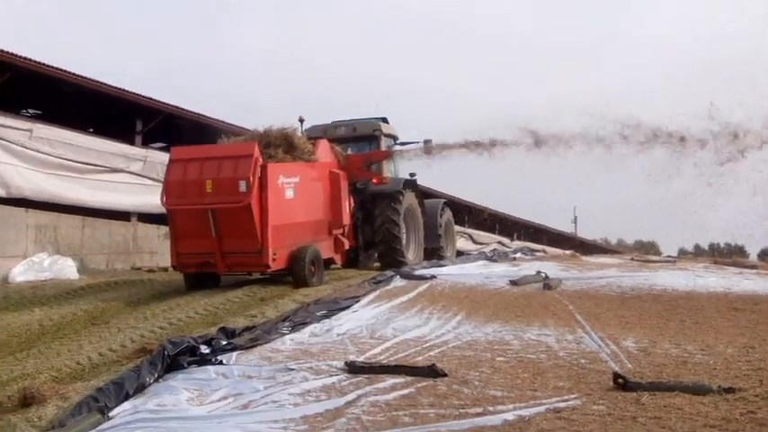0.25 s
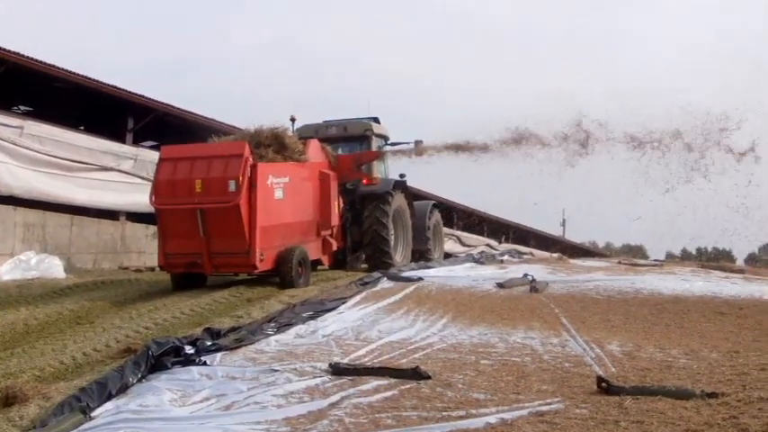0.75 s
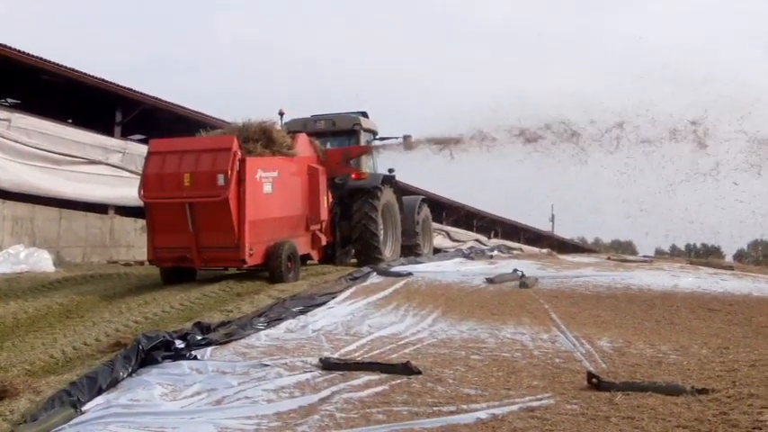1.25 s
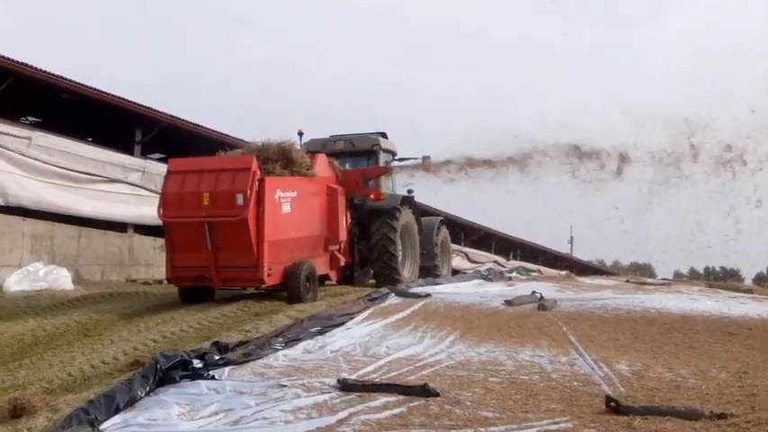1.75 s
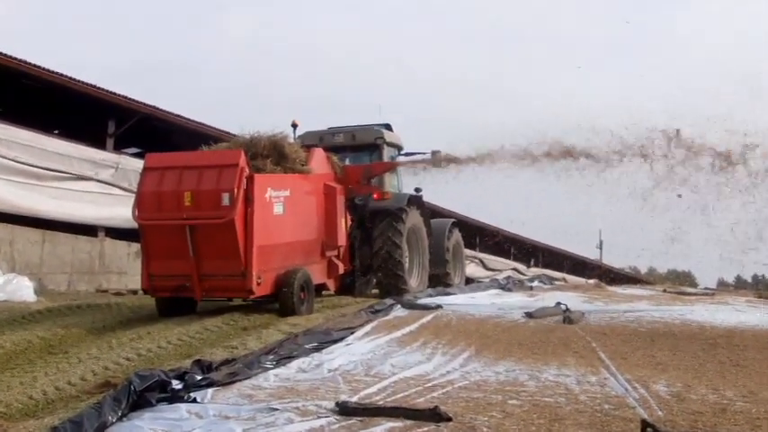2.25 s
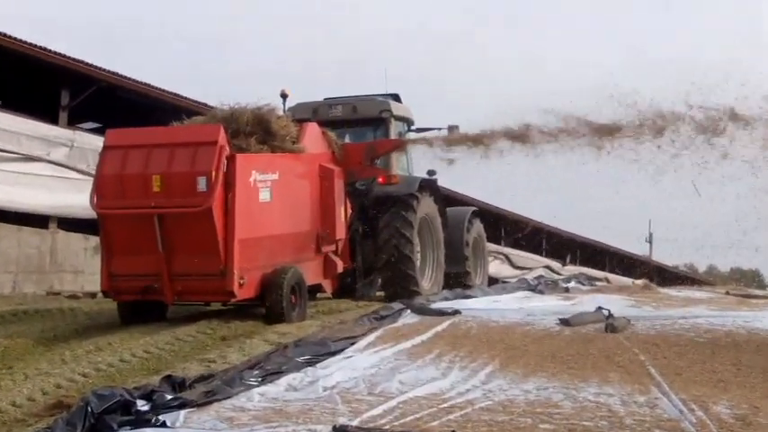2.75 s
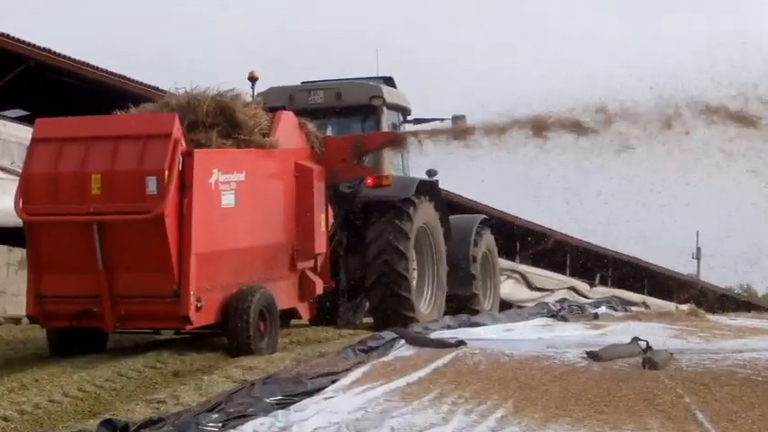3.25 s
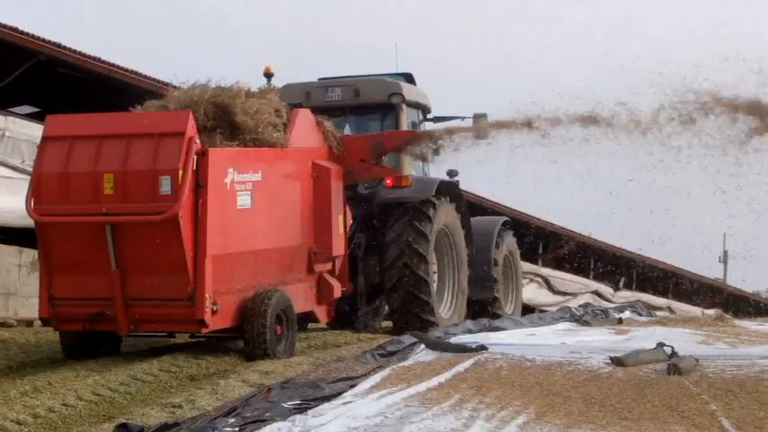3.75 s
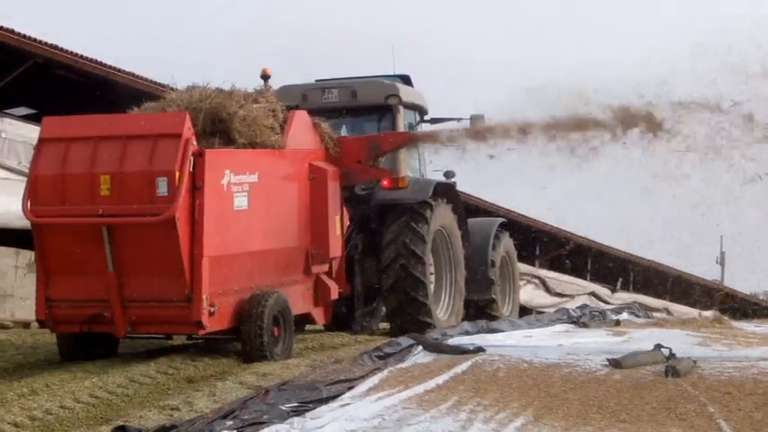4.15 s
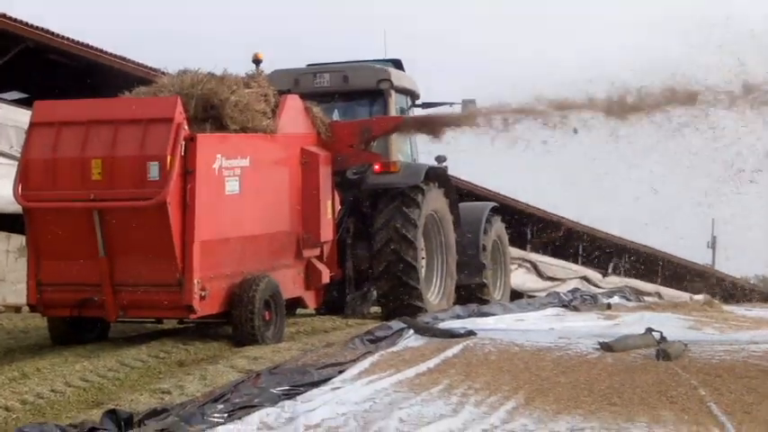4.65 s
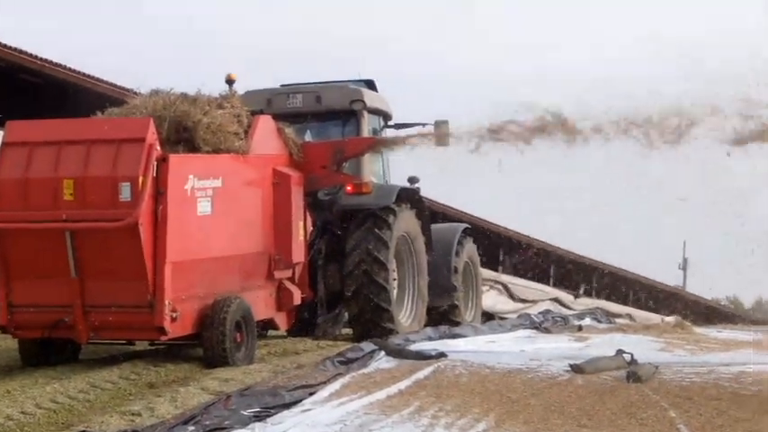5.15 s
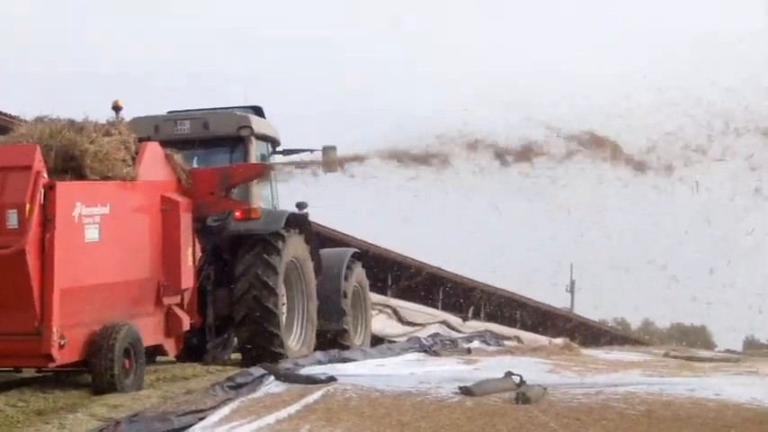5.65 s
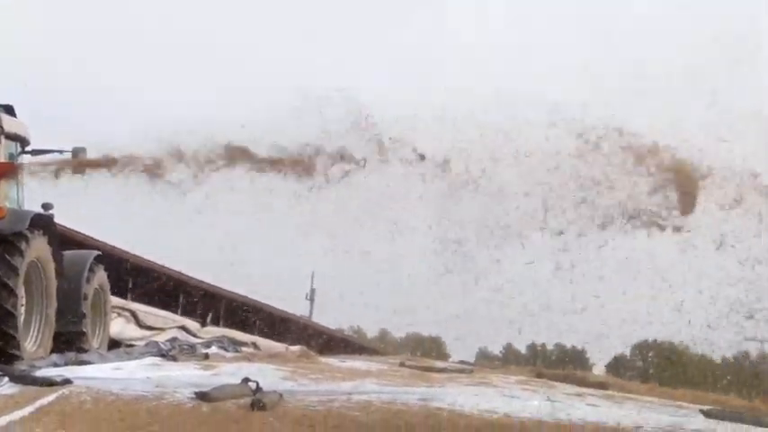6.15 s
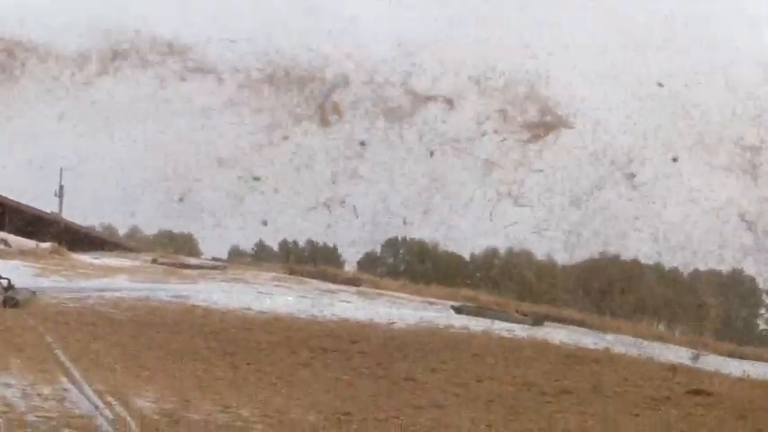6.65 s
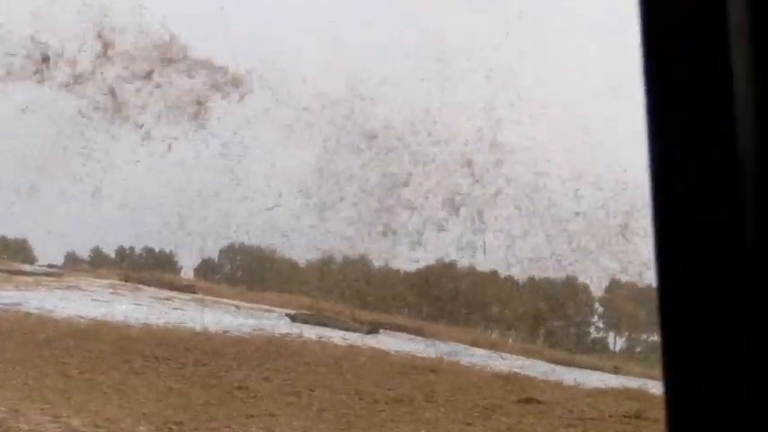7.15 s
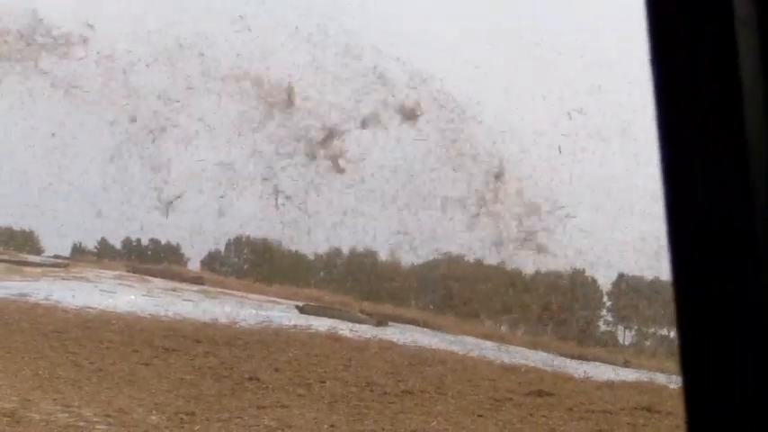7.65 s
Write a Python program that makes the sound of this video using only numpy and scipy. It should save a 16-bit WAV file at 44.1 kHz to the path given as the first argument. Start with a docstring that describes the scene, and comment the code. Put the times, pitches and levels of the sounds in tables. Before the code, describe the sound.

Heard from some way off on one microphone outdoors, a bale shredder runs without a break: tractor exhaust drone, pulsing blower paddles and a broad roar. Over it comes a constant hiss of stalks on steel, dotted with small pings and crunchy clumps. A farther engine rises in pitch twice underneath, and the sound softens a little toward the end.

```python
"""Bale shredder in an open yard

A six-cylinder diesel tractor turns a bale shredder, some way off from a camera's single microphone.
The exhaust drones, the blower's paddles throb against it and straw rattles through the steel chute
in clumps. A second engine farther away revs up twice. Near the end the microphone turns aside."""
import sys
import numpy as np
from scipy import signal
from scipy.fft import rfft, irfft, next_fast_len
from scipy.io import wavfile
from scipy.ndimage import uniform_filter1d, map_coordinates

SR = 44100
rng = np.random.default_rng(int(sys.argv[2]) if len(sys.argv) > 2 else 0)


def to_wav(s):
    """Save 16-bit WAV."""
    ch = np.atleast_2d(s).T  # columns
    pcm = np.round(np.clip(ch, -1, 1) * 32767)  # PCM
    wavfile.write(sys.argv[1], SR, pcm.astype(np.int16))


N = 348390

# Modes of the steel chute. Each row: frequency in Hz, seconds to die away by 60 dB, relative level in dB.
CHUTE_MODES = [(2120, 0.043, -4.5), (2487, 0.042, -1.5), (2872, 0.075, 0), (3610, 0.043, -9.5),
               (3800, 0.061, -0.5), (4150, 0.053, -1.5), (4650, 0.045, -1), (5040, 0.062, 2),
               (5180, 0.056, -2), (5440, .04, 0.5), (5730, 0.048, 0), (6180, 0.047, -1.5), (6790, .03, 0),
               (9370, 0.035, -12.5), (9800, .03, -20), (11600, .03, -14.5)]


def amp(db):
    """Gain of a level in dB."""
    return 10 ** (np.asarray(db) / 20)


def unit(x):
    """x at rms 1."""
    return x / np.sqrt(np.mean(x ** 2) + 1e-20)


def curve(points):
    """(seconds, value) points joined by straight lines, one value a sample."""
    seconds, values = np.transpose(points)
    return np.interp(np.arange(N) / SR, seconds, values)


def wobble(rate):
    """A smooth random curve, rate knots a second."""
    knots = rng.standard_normal(int(N * rate / SR) + 4)
    return map_coordinates(knots, [np.arange(N) * rate / SR])


def filtered(x, response):
    """x through a filter whose gain is response(Hz)."""
    size = next_fast_len(N + 8192)
    return irfft(rfft(x, size) * response(np.fft.rfftfreq(size, 1 / SR)), size)[..., :N]


def coloured(x, spectrum):
    """x shaped by (Hz, dB) points on a log frequency axis, at rms 1."""
    hz, db = np.transpose(spectrum)
    return unit(filtered(x, lambda f: amp(np.interp(np.log(f + 1), np.log(hz + 1), db))))


def phase_of(hz):
    """Angle in radians run through at a changing rate."""
    return 2 * np.pi * np.cumsum(hz) / SR


def tone(phase, db):
    """A sine of the given rms level with a random starting phase."""
    return np.sqrt(2) * amp(db) * np.sin(phase + rng.uniform(0, 2 * np.pi))


def patchy_noise(depth_db):
    """White noise with patches of random gain in time and frequency."""
    spectra = signal.stft(rng.standard_normal(N), nperseg=512)[2]
    patches = uniform_filter1d(rng.standard_normal(spectra.shape), size=8, axis=0)
    patches = uniform_filter1d(patches, size=8, axis=1)
    return signal.istft(spectra * amp(depth_db * unit(patches)), nperseg=512)[1][:N]


def yard(x):
    """Echoes off ground and wall cancel the direct sound in a few narrow bands."""
    # Each row: centre in Hz, width in Hz, gain at the centre in dB.
    valleys = [(370, 31, -11), (853, 25, -6), (1080, 32, -5), (1544, 54, -3), (2255, 150, -4),
               (2540, 56, -2.5)]
    return filtered(x, lambda f: amp(sum(db / (1 + (2 * (f - hz) / width) ** 2)
                                         for hz, width, db in valleys)))


def off_axis(x, gain_db, above_hz):
    """The microphone hears less of the higher range once it points elsewhere."""
    highs = filtered(x, lambda f: f ** 2 / (f ** 2 + above_hz ** 2))
    return x + (amp(gain_db) - 1) * highs


def far_engine():
    """Only the firing tone carries this far; each pull starts low and climbs ever more slowly."""
    # Each row: start of a pull in seconds, time constant in seconds.
    pulls = [(1.5, .9), (5.298, 1.1)]
    # Each row: time in seconds, level in dB.
    levels = [(0, -38), (1.2, -22), (1.45, -26), (1.65, -15), (2.4, -23), (2.9, -27), (4, -23), (4.6, -30),
              (5.8, -35), (6.3, -21.5), (7.2, -20), (7.9, -38)]
    low_hz, full_hz = 54.94, 75.36
    t = np.arange(N) / SR
    firing_hz = np.full(N, full_hz)
    for start, lag in pulls:
        climb_hz = full_hz - (full_hz - low_hz) * np.exp(-np.maximum(t - start, 0) / lag)
        firing_hz = np.where(t < start, firing_hz, climb_hz)
    return tone(phase_of(firing_hz + 0.43 * wobble(6)), curve(levels) + 0.8 * wobble(5.3))


def panel_hum():
    """Panels and drive line hum: noise ringing in narrow resonances."""
    # Each row: centre in Hz, width in Hz, level in dB.
    resonances = [(95.4, 2.7, -39), (151.4, 6.1, -32), (564.6, 20, -41.5), (716.7, 18, -47), (913, 22, -45),
                  (956, 13, -41.5), (1192, 28, -46), (1379, 42, -45), (1723, 63, -52.5), (3700, 140, -52.5),
                  (5020, 300, -41.5)]
    hum = np.zeros(N)
    for hz, width, db in resonances:
        band = filtered(rng.standard_normal(N), lambda f: 1 / (1 + (2 * (f - hz) / width) ** 2))
        hum += amp(db) * unit(band)
    return hum


def roar(paddle_phase):
    """Broad noise of engine and air that swells as each paddle passes the outlet."""
    # Each row: frequency in Hz, relative level in dB.
    spectrum = [(8, -32), (25, -7), (55, -1), (80, -7), (100, -16), (150, -15), (200, -22), (360, -21),
                (600, -25), (860, -23.5), (1000, -25), (1500, -30), (2300, -31), (5000, -58.5)]
    level_db = -20 + 0.44 * np.sin(paddle_phase) + 0.45 * wobble(5)
    return amp(level_db) * coloured(patchy_noise(depth_db=0.57), spectrum)


def chute(blows):
    """The steel rings in each mode under that mode's own row of blows."""
    t = np.arange(SR // 8) / SR
    rings = np.array([amp(db - 60 * t / t60) * np.sin(2 * np.pi * hz * t) for hz, t60, db in CHUTE_MODES])
    return signal.fftconvolve(blows, rings, axes=1)[:, :N].sum(axis=0)


def pings(hits_per_s=40):
    """Hard bits of stalk and grit strike the chute at random spots, each waking one mode."""
    shape = (len(CHUTE_MODES), N)
    blows = (rng.random(shape) < hits_per_s / SR) * rng.standard_normal(shape)  # that rate for each mode
    return amp(-39) * unit(chute(blows))


def straw(firing_phase, paddle_phase):
    """Stalks hiss on steel, louder as tufts pass, pulsing with the paddles and the engine's shake."""
    # Straw fed into the chute. Each row: time in seconds, dB about the mean.
    feed = [(0, 0.9), (1.45, -0.3), (1.9, -0.1), (2.4, -0.2), (3.5, 1), (3.94, 0), (4.4, 0.8), (6.35, -.5),
            (6.6, 1), (6.85, 1.5), (7.05, -0.9), (7.5, 0), (7.9, -.5)]
    # Colours of stalks on steel and of fine spray. Each row: frequency in Hz, relative level in dB.
    stalk_spectrum = [(880, -12.5), (1500, -1), (2030, -2.5), (2300, -4), (2830, -1.5), (4360, -2),
                      (5150, -0.5), (6380, -4), (7500, -12.5), (9000, -22), (15000, -60)]
    spray_spectrum = [(6000, -32), (7500, -0.5), (9400, -0.5), (11500, -5.5), (13500, -11), (15700, -31)]
    feed_db = curve(feed)
    tufts_db = 0.54 * wobble(11) + .5 * wobble(25) + .5 * wobble(70)
    pulse_db = .5 * np.sin(paddle_phase) + .5 * np.sin(firing_phase) + 0.11 * np.sin(firing_phase / 3)
    ticks = unit((rng.random(N) < 900 / SR) * rng.standard_normal(N))  # about 900 a second
    stalks = coloured(unit(patchy_noise(depth_db=0.18)) + 0.28 * ticks, stalk_spectrum)
    spray = coloured(unit(patchy_noise(depth_db=0.6)) + 0.26 * ticks, spray_spectrum)
    stalks_db = -29 + feed_db + tufts_db
    spray_db = -46 + 2.1 * feed_db + 1.05 * tufts_db + 0.34 * wobble(5.9)  # swings wider than the feed
    return amp(pulse_db) * (amp(stalks_db) * stalks + amp(spray_db) * spray)


def clumps(small_count=16, rise_s=0.01, lead_s=.004):
    """Each clump is a gritty burst that rises fast, thins out and rings the chute."""
    # Each row: time in seconds, level in dB, frequency that rings most in Hz.
    big_clumps = [(0.8016, -24, 5450), (1.297, -23.5, 6270), (1.368, -24.5, 5140), (1.6904, -27, 3765),
                  (1.706, -27, 5770), (1.768, -22, 5800), (1.837, -29, 5020), (2.0264, -21.5, 3776),
                  (2.2165, -19, 6170), (2.737, -29, 5060), (2.813, -24, 5096), (2.8664, -21, 3800),
                  (3.213, -28, 5150), (4.019, -20, 5434), (4.3744, -27.5, 5400), (4.43, -29, 6200),
                  (5.1995, -26, 5220), (5.311, -22, 5710), (5.843, -30, 4070), (6.106, -22, 3993),
                  (6.6144, -22.5, 5210), (6.7276, -25, 5940), (6.7454, -19, 5620), (6.823, -26, 4460),
                  (7.003, -25, 4850), (7.2943, -27.5, 4970), (7.44, -28, 5620)]
    small_times = lead_s + rng.random(small_count) * N / SR
    level_scatter, pitch_scatter = rng.standard_normal((small_count, 2)).T
    small_clumps = np.c_[small_times, -33.5 - 2 * level_scatter, 5130 + 250 * pitch_scatter]
    hits = np.vstack([big_clumps, small_clumps])
    modes_hz = np.array(CHUTE_MODES)[:, :1]
    landings_db = rng.normal(0, 1.8, (len(hits), len(modes_hz), 1))  # where it lands favours some modes
    envelope = np.zeros(N + SR)
    mode_drive = np.zeros((len(modes_hz), N + SR))
    age = np.arange(SR // 4) / SR / rise_s  # in rise times
    for (time, db, hz), landing_db in zip(hits, landings_db):
        burst = amp(db) * age * np.exp(1 - age)
        start = max(round((time - lead_s) * SR), 0)
        span = slice(start, start + len(burst))
        envelope[span] += burst
        emphasis_db = 8 / (1 + ((modes_hz - hz) / 200) ** 2)
        mode_drive[:, span] += burst * amp(landing_db + emphasis_db)
    grit = rng.standard_normal((2, N)) * amp(1.2 * wobble(900))
    crunch = coloured(grit[0], [(1200, -31), (2500, -4.5), (5000, 1.0), (6800, -1.5), (8500, -21.0)])
    snap = coloured(grit[1], [(6000, -30), (8500, 0), (11000, -7), (13000, -19), (15700, -40)])
    ring = chute(mode_drive[:, :N] * rng.standard_normal((len(modes_hz), N)))
    return envelope[:N] * (amp(-6.5) * crunch + amp(-22) * snap) + amp(-39.5) * ring


def blower(paddle_phase):
    """Six unequal paddles on a flywheel throb at multiples of its turning rate."""
    # Each row: multiple of the flywheel's rate, level in dB.
    orders = [(3, -47), (5, -38), (6, -20.5), (7, -34), (8, -53), (9, -54), (12, -17.5), (15, -25.5),
              (18, -29), (21, -45), (24, -38), (50, -42)]
    flywheel_phase = paddle_phase / 6
    return sum(tone(order * flywheel_phase, db + 1.2 * wobble(2.88)) for order, db in orders)


def exhaust(firing_phase):
    """The tractor's exhaust drones at orders of the firing rate, each wavering in strength."""
    # Each row: multiple of the firing rate, level in dB, unsteadiness in dB.
    orders = [(.5, -50, 11), (1, -13, 0.5), (2.5, -39.5, 5.5), (3, -32, 4.5), (4, -34.5, -0.5),
              (5, -43.5, 5), (6, -37.5, 2.5), (7, -38.5, 4), (9, -31.5, 2), (10, -45, 1), (12, -61, 6)]
    return sum(tone(order * firing_phase, db + waver_db * np.tanh(wobble(9) + 0.44 * wobble(2.97)))
               for order, db, waver_db in orders)


def scene():
    """The machines across the yard, heard by one microphone that turns away at the end."""
    # Tractor speed. Each row: time in seconds, firings a second.
    firing_rates = [(0, 46.84), (.2, 46.66), (.7, 46.14), (1.15, 46.5), (2.1, 46.59), (2.7, 46.33),
                    (3.1, 46.17), (3.65, 45.8), (4.15, 46.24), (4.6, 46), (5.1, 46.85), (5.5, 46.9),
                    (6.1, 46.53), (6.6, 46.75), (7.9, 46.87)]
    # Blower speed. Each row: time in seconds, paddle passes a second.
    paddle_rates = [(0, 26.69), (3.5, 26.53), (5, 26.21), (7.9, 26.35)]
    governor_hunt_hz = 0.082 * wobble(7)
    firing_phase = phase_of(curve(firing_rates) + governor_hunt_hz)
    paddle_phase = phase_of(curve(paddle_rates))
    away = curve([(6.1, 0), (7.9, 1)])  # 0 facing the shredder, 1 turned aside
    drone = exhaust(firing_phase) + blower(paddle_phase) + far_engine()
    air = off_axis(roar(paddle_phase), gain_db=-6.5 * away, above_hz=1800)
    steel = off_axis(panel_hum() + pings(), gain_db=-1 * away, above_hz=1500)
    rattle = amp(-.8 * away) * straw(firing_phase, paddle_phase)
    return yard(drone + air + steel + rattle + clumps())[None]


def record(dry):
    """The camera rounds off peaks, adds hiss and whine, dips near half its line rate and limits the band."""
    # Line whine and its field sidebands. Each row: frequency in Hz, level in dB.
    whine_tones = [(15614, -77), (15674, -77), (15734, -69)]
    dip_hz, dip_width_hz = 7850, 270
    low_cut_hz, top_hz = 8, 15750
    ceiling = np.where(dry > 0, 1.15, .95)  # downward peaks round off sooner
    rounded = dry / (1 + np.abs(dry / ceiling) ** 5) ** (1 / 5)
    whine = sum(tone(2 * np.pi * hz * np.arange(N) / SR, db) for hz, db in whine_tones)
    hiss = amp(-59) * rng.standard_normal(N)
    dipped = filtered(rounded + hiss,
                      lambda f: np.hypot(f - dip_hz, 20) / np.hypot(f - dip_hz, dip_width_hz / 2))
    return filtered(dipped + whine, lambda f: (f < top_hz) * f ** 2 / (f ** 2 + low_cut_hz ** 2))


dry = scene()
out = record(dry)
to_wav(out)
```